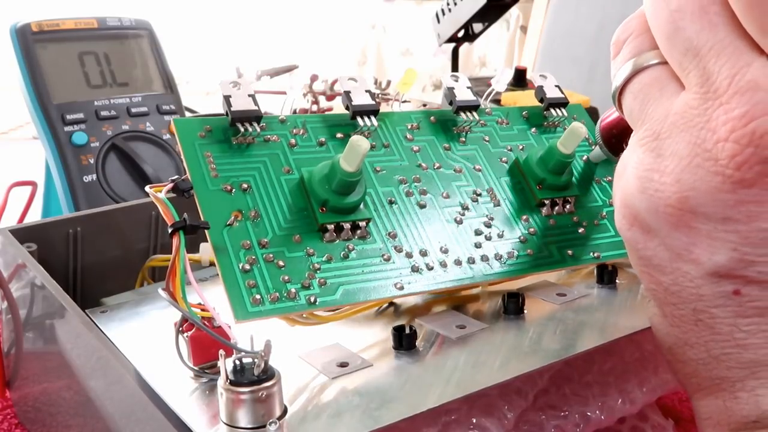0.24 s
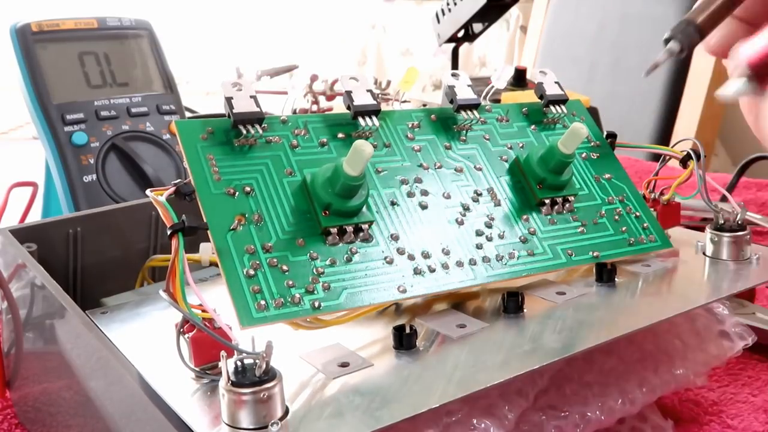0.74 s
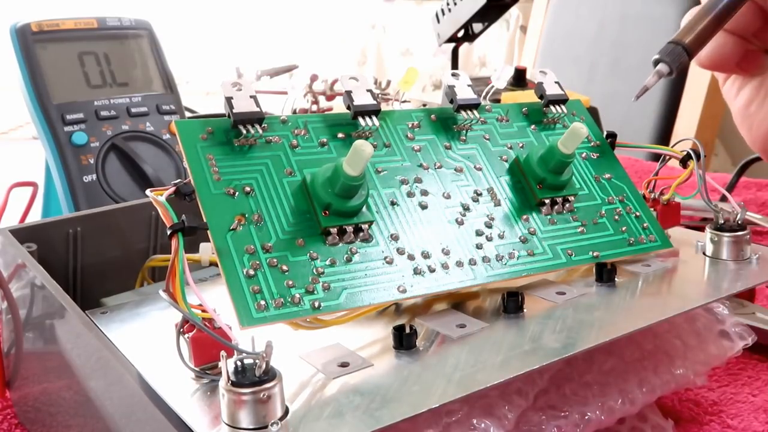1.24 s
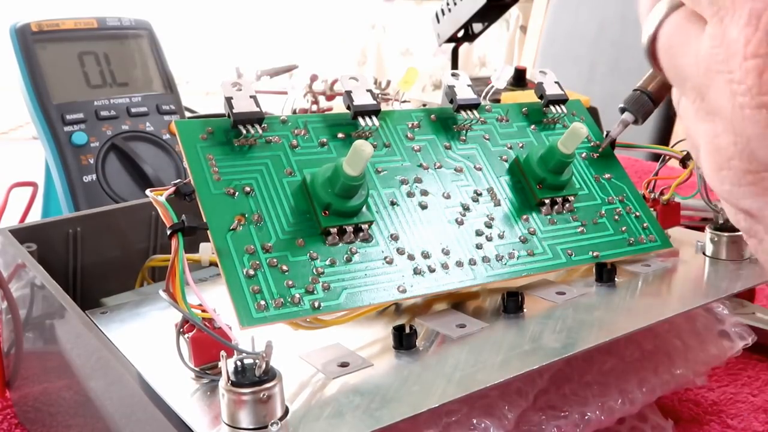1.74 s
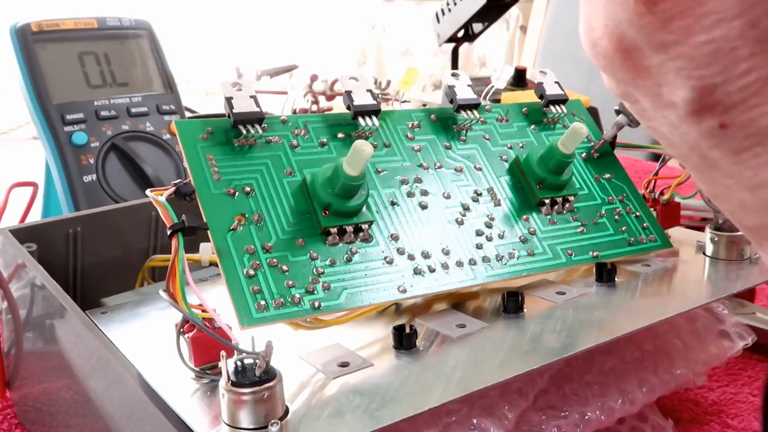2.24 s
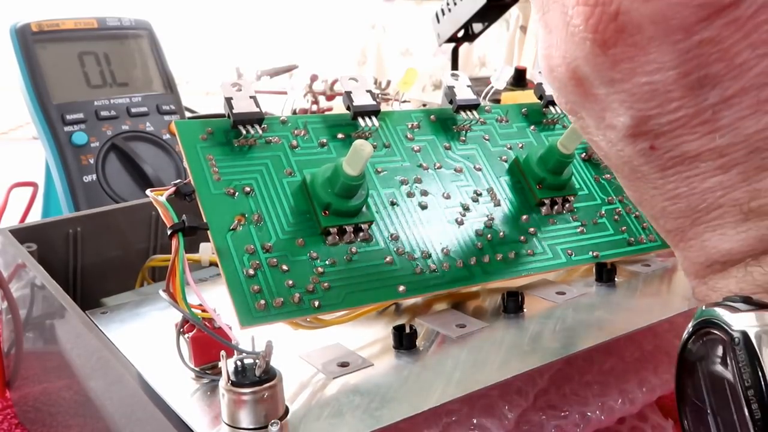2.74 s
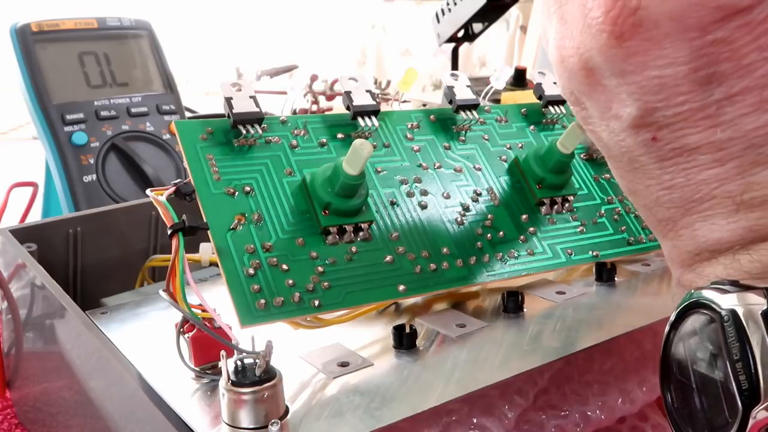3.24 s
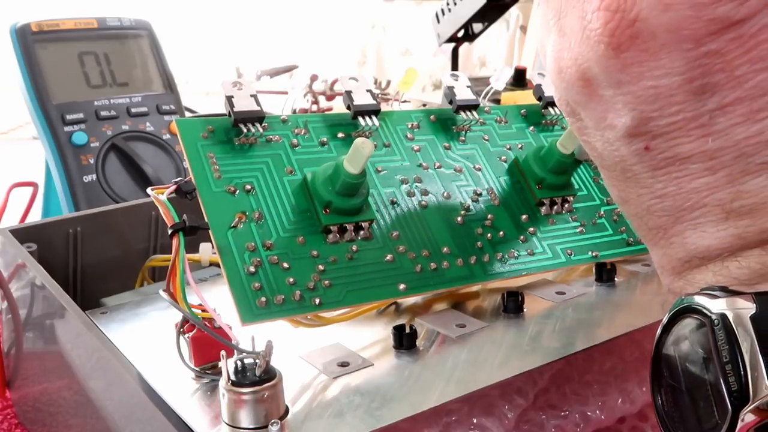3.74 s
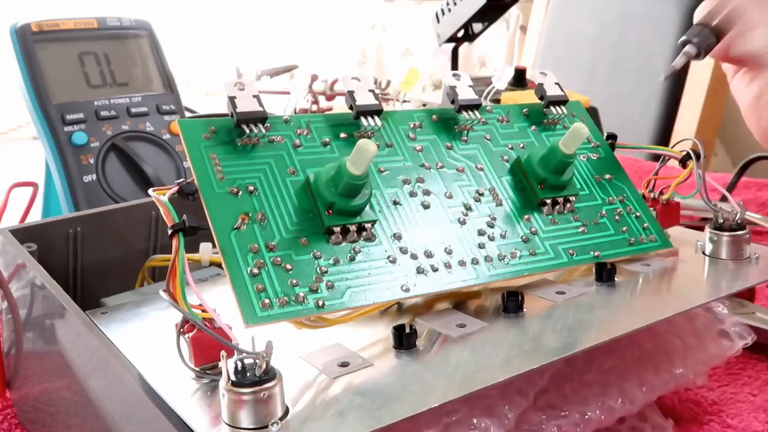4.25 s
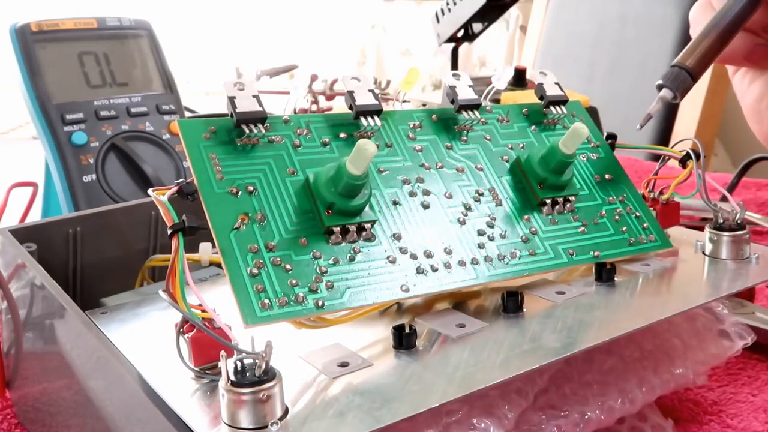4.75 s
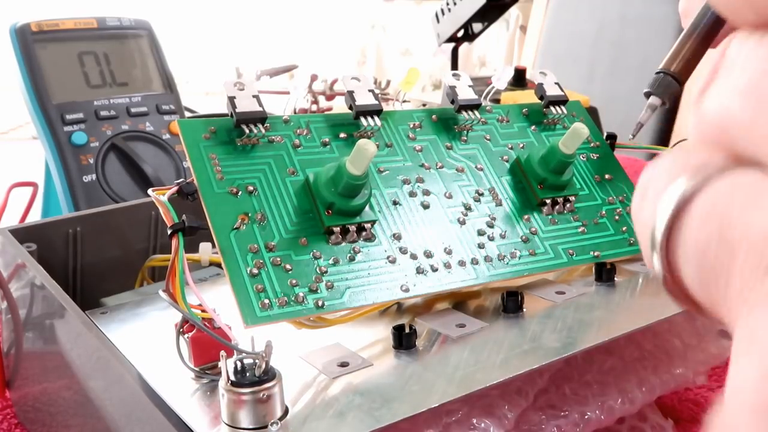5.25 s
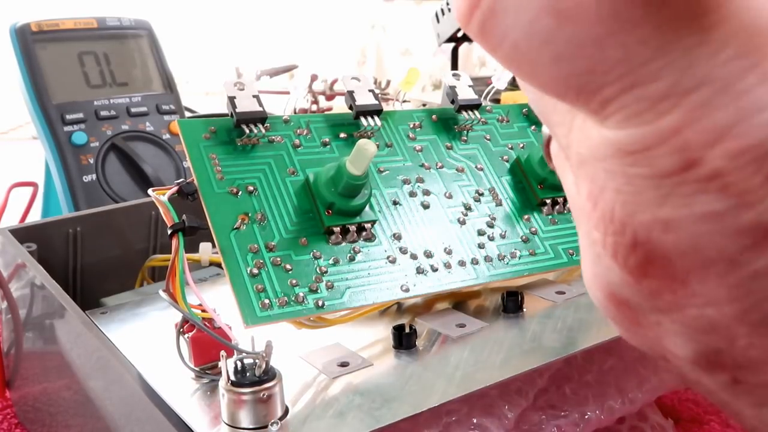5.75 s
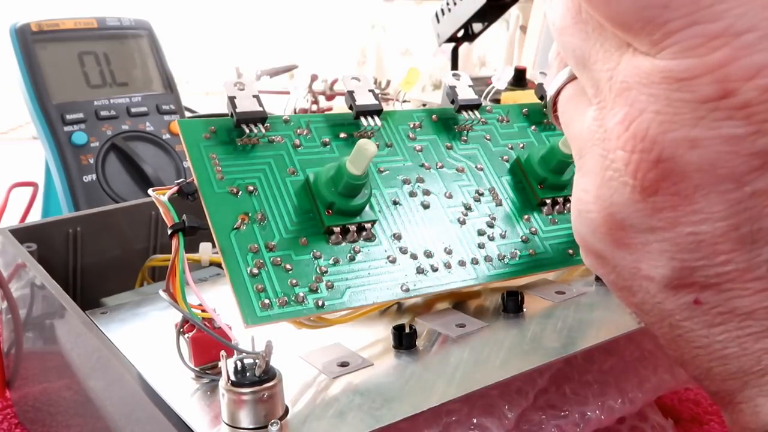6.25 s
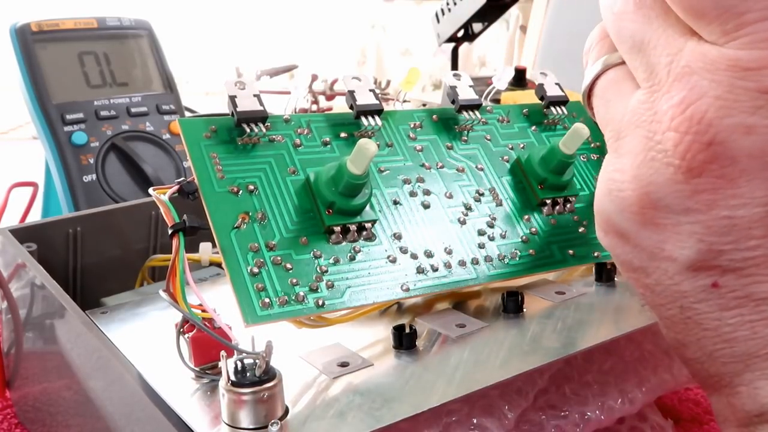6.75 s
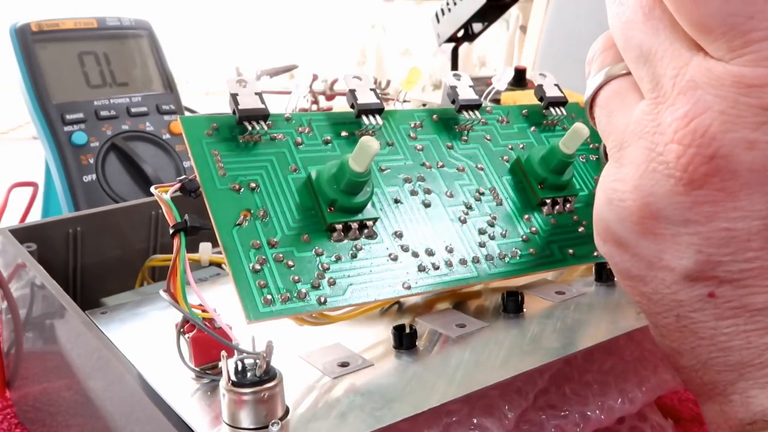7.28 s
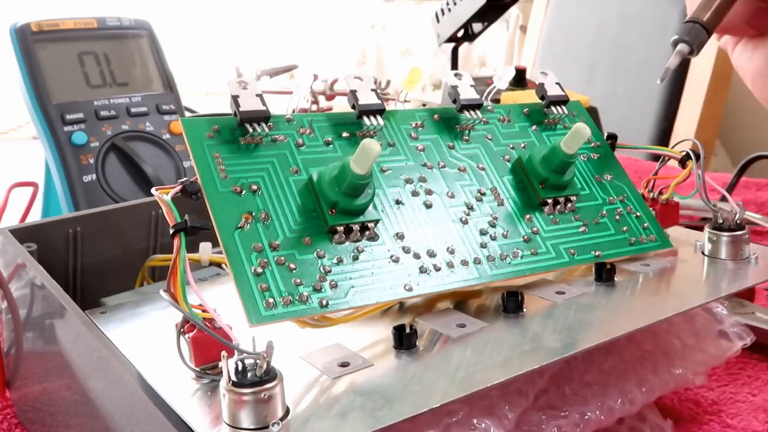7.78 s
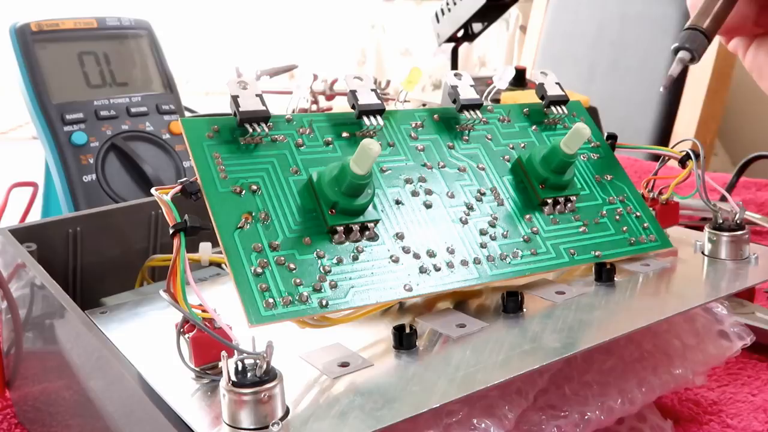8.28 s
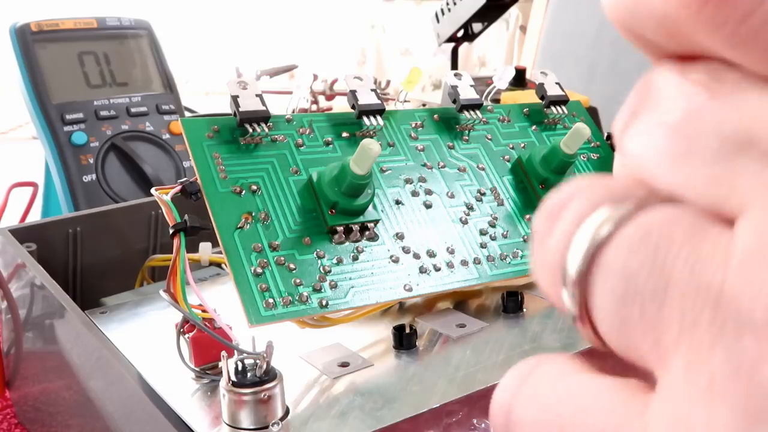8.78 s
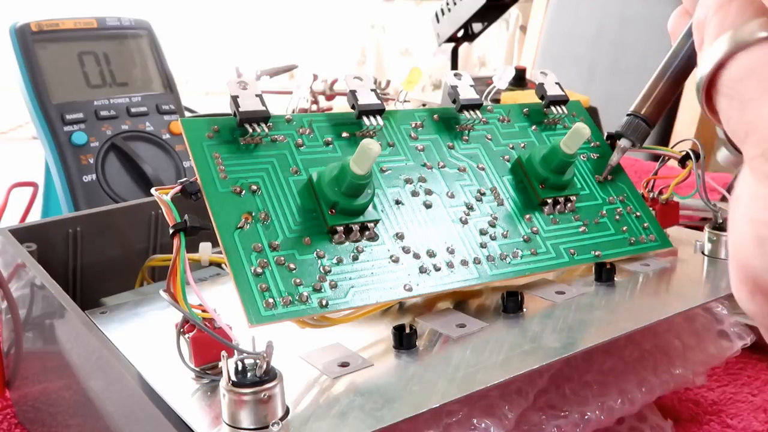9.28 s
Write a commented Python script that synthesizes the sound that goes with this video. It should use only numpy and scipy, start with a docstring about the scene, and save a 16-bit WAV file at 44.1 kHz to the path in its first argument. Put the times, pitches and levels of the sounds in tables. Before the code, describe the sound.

A spring-loaded solder sucker fires with sharp clacks and is re-cocked with bright snaps three times, close up in a small quiet room.

```python
"""A spring-loaded solder sucker is fired three times on a circuit board and cocked again, close to the mic.
Firing: button tick, rush of the piston as shaped noise, slam of ringing modes, then the board clatters.
Cocking: the seal hisses as noise, the latch snaps and buzzes, the plunger drops back and its spring rings.
Taps, tinks, scuffs and knocks fall between. A small room answers over room tone, hum and a thin whine;
gain control dips everything after loud hits."""
import sys
import numpy as np
from scipy import signal
from scipy.fft import rfft, irfft
from scipy.io import wavfile
from scipy.ndimage import uniform_filter1d

SR = 44100
rng = np.random.default_rng(int(sys.argv[2]) if len(sys.argv) > 2 else 0)


def wrap_up_sound(samples):
    """Save the sound to the file named by the first command line argument, as 16-bit audio."""
    columns = np.atleast_2d(samples).T
    # keep every value between -1 and 1, then stretch to whole-number steps
    tamed = np.clip(columns, -1, 1)
    steps = np.round(tamed * 32767).astype(np.int16)
    wavfile.write(sys.argv[1], SR, steps)


N = 419832

# modes of pump barrel and spring: f/Hz, t60/s, relative level/dB on slam, on latch, on drop
PUMP_MODES = [(112, 0.023, -16.5, -26.5, -40.5), (307, 0.042, -2.5, -25.5, 0), (684, 0.0081, -17, -38, 1.5),
              (1270, 0.0055, -16, -67, 3), (2160, 0.013, -22, -57, -19), (2800, 0.081, -27.5, -25, -33),
              (3150, 0.057, -15, -3, -3), (3456, 0.04, -12.5, 1.5, -23), (3800, .008, -19, -16, 9),
              (4950, 0.016, 6.5, -1, 1.5), (6160, 0.0076, -10, 11.5, 4), (5860, 0.0013, 7, 2, -21),
              (7510, 0.0093, 2.5, 17.5, 12.5), (9500, 0.005, -8, 6.5, -2), (13360, .008, -1, -31, -2)]


def gain_of(db):
    """Amplitude factor of a level in dB."""
    return 10 ** (np.asarray(db) / 20)


def evened(x):
    """Scale to rms 1."""
    return x / np.sqrt(np.mean(x ** 2) + 1e-20)


def read(points, hz):
    """Read a curve of (f/Hz, value) points, straight over log frequency."""
    f, value = np.transpose(points)
    return np.interp(np.log(hz + 1), np.log(f + 1), value)


def add(mix, s, sound):
    """Lay a sound into the mix from s seconds on, cut at the end."""
    part = mix[..., round(s * SR):][..., :sound.shape[-1]]
    part += sound[..., :part.shape[-1]]


def coloured(spectrum, count):
    """Noise with the given spectrum, scaled to rms 1 before it is cut to count samples."""
    size = max(count, 4096)
    bins = rfft(rng.standard_normal(size))
    bins = bins * gain_of(read(spectrum, np.fft.rfftfreq(size, 1 / SR)))
    return evened(irfft(bins, size))[:count]


def wavering(depth_db, width, count):
    """Gain that wanders by depth_db rms, smoothed over width samples: an uneven contact or flow."""
    return gain_of(depth_db * evened(uniform_filter1d(rng.standard_normal(count), width)))


def modes(hz, t60, db):
    """Sum of dying sines, one for each way the body vibrates; peak 1."""
    t = np.arange(SR // 3) / SR
    decay = gain_of(np.c_[db] - 60 * t / np.c_[t60])
    body = (decay * np.sin(2 * np.pi * np.c_[hz] * t)).sum(0)
    return body / abs(body).max()


def ring(hz, t60, db, contact_s, chatter_db):
    """One blow rings the modes and the parts chatter. Rows: sound towards the mic, sound round the room."""
    body, t = modes(hz, t60, db), np.arange(900) / SR
    crack = body[:60] * np.exp(-t[:60] / 0.0011)  # the bare contact: same colour, no ring
    crack = gain_of(chatter_db) * crack / np.linalg.norm(crack)
    off_axis = body * np.exp(-np.arange(len(body)) / SR / .004)  # long rings are faint off axis
    out = np.array([body, off_axis])
    chatter = rng.standard_normal(900) * np.exp(-(t / contact_s) ** 2)
    add(out[0], 0, np.convolve(chatter, crack))
    # summed over directions the chatter has an even spectrum
    add(out[1], 0, crack * np.sqrt(contact_s * SR / 4))
    return out


def board(hardness_db):
    """Modes of the board; a harder blow wakes the upper ones by hardness_db per octave."""
    # circuit board on its metal chassis: f/Hz, t60/s, relative level/dB
    board_modes = [(165, 0.4, -11.5), (350, 0.0567, -9.5), (477, 0.024, 8.5), (642.3, 0.16, 9.5),
                   (803, 0.11, -2.5), (1084, 0.026, 14.5), (1443, 0.042, -4), (2120, 0.033, -15.5),
                   (3220, .01, -8.5)]
    hz, t60, db = np.transpose(board_modes)
    return hz, t60, db + hardness_db * np.log2(hz / 650)


def rubbed(hardness_db, count):
    """The board kept ringing, and damped, by a rough lasting contact; rms 1."""
    hz, t60, db = board(hardness_db)
    damped = np.minimum(t60, .012)
    grit = rng.standard_normal(SR // 2) * wavering(2.3, 90, SR // 2)
    return evened(signal.fftconvolve(grit, modes(hz, damped, db), "valid")[:count])


def room_tone():
    """Random short-time spectra with drifting patches, alike at both ports only in the bass; one thin whine."""
    # colour of room tone and hiss: f/Hz, relative level/dB
    tone_colour = [(12, -53), (20, -8), (32, -10), (64, -7), (118, -13.5), (169, -9), (217, -10.5),
                   (337, -8.5), (540, -14.5), (1110, -18), (1390, -18), (6720, -30), (13400, -40.5),
                   (15000, -50)]
    # left-right likeness of the room tone: f/Hz, likeness (1 = the same)
    likeness = [(60, .99), (120, .85), (240, .3), (480, 0), (15000, 0)]
    # faint electric whine: f/Hz, rms level/dB
    whine_hz, whine_db = (13006, -93)
    tone_db = -56.5  # rms of the two ports averaged
    frames, hz = N // 256 + 5, np.fft.rfftfreq(1024, 1 / SR)
    a, b, c, d, patches = rng.standard_normal((frames, 513, 5)).T
    patches = evened(uniform_filter1d(uniform_filter1d(patches, 6, 0), 20, 1))
    patch_db = patches * (1.25 + 0.1 * np.exp(-hz / 400))[:, None]  # a little deeper in the bass
    same, left = np.clip(read(likeness, hz), -1, 1)[:, None], a + 1j * b
    right = same * left + np.sqrt(1 - same ** 2) * (c + 1j * d)
    z = np.array([left, right]) * gain_of(read(tone_colour, hz)[:, None] + patch_db)
    hiss = signal.istft(z, nperseg=1024, noverlap=768)[1][:, :N]
    hiss = gain_of(tone_db) * hiss / np.sqrt(np.mean(hiss.mean(0) ** 2))
    whine = np.sqrt(2) * gain_of(whine_db) * np.sin(2 * np.pi * whine_hz * np.arange(N) / SR)
    return hiss + whine


def hum():
    """A wavering hum nearby: noise through narrow resonances, alike at both ports."""
    # hum bands: f/Hz, width/Hz, rms level/dB
    hum_bands = [(61, 9.2, -64), (89, 5.7, -68.5), (153.1, 10, -74), (333, 18, -69)]
    out = np.zeros(N)
    for hz, width, db in hum_bands:
        band = signal.lfilter(*signal.iirpeak(hz, hz / width, fs=SR), rng.standard_normal(N))
        out += gain_of(db) * evened(band)
    return out


def nozzle_taps():
    """Nozzle or iron touches the board and rings its modes."""
    # touches: t/s, level/dB, hardness/(dB per octave)
    touches = [(0.369, -35, -6.5), (1.481, -38.5, -3), (1.524, -50.5, 7), (2.6054, -28.5, 8.5),
               (2.837, -45, -8.5), (2.937, -35.5, 5), (3.0713, -42.5, 6), (3.178, -38.5, -8),
               (8.4967, -39, 2), (9.338, -63.5, 9.5)]
    out = np.zeros((2, N))
    for s, db, hardness_db in touches:
        add(out, s, gain_of(db) * ring(*board(hardness_db), 0.011, chatter_db=-8))
    return out


def small_ticks():
    """Button, ring and plunger tick: brief high modes of tiny parts."""
    # ticks: t/s, level/dB, f/Hz that the overtones are scaled from
    tick_events = [(0.661, -30.5, 2140), (1.1875, -21.5, 4000), (1.3533, -18, 4800), (1.435, -34, 4040),
                   (3.909, -38.5, 2420), (4.1334, -25.5, 4650), (4.137, -24.5, 2460), (4.449, -28.5, 4700),
                   (4.6769, -36.5, 1800), (4.826, -38, 5700), (6.575, -44, 1513), (7.1312, -42, 1540),
                   (7.6225, -16.5, 2830), (8.056, -37.5, 4380), (8.354, -17.5, 4770), (8.4652, -30, 7280)]
    out = np.zeros((2, N))
    thin = signal.butter(1, 1200, "high", fs=SR, output="sos")  # tiny parts have no low end
    t60 = .004 * np.array([.6, 1.5, 1.1, 0.41])
    for s, db, hz in tick_events:
        overtones = np.minimum(hz * np.array([.62, 1.01, 1.45, 2.1]), 15000)
        tick = ring(overtones, t60, [-34.5, 0, 3.0, 4.0], contact_s=.0013, chatter_db=-7.0)
        add(out, s, gain_of(db) * signal.sosfilt(thin, tick))
    return out


def firings():
    """Rush, slam with a rattle of spring and solder, recoil into the board, which then clatters on its posts."""
    # piston hits its stop: t/s, slam level/dB, rush level/dB, clatter level/dB
    shots = [(0.7050, 1.5, -16, -23), (4.2102, 2, -14, -21.5), (7.6750, 2.5, -12.5, -24)]
    # air and spring in flight: f/Hz, relative level/dB
    rush_colour = [(59, -42), (100, 2), (1210, -10), (1770, -15.5), (2330, -3.5), (3340, -9), (4990, -6),
                   (8290, -5), (12700, -1), (15600, -23)]
    flight_s, speedup_s = .02, .012  # piston travel time, and the part of it spent gathering speed
    clatter_after_s = 0.035  # the board starts to clatter this long after the slam
    out, (hz, t60, slam_db, *_) = np.zeros((2, N)), np.transpose(PUMP_MODES)
    t, flight = np.arange(SR // 5) / SR, np.arange(SR // 25) / SR
    speed = np.minimum(flight / speedup_s, 1) ** 2 * (flight < flight_s)
    burst_decay = gain_of(-60 * t / 0.024) + 0.29 * gain_of(-60 * t / 0.14)
    clatter_shape = np.exp(-t[:6000] / 0.033) * np.minimum(t[:6000] / 0.0027, 1)
    rattle_band = signal.butter(1, [400, 6500], "band", fs=SR, output="sos")
    for s, db, rush_db, clatter_db in shots:
        rasp = evened(wavering(2.5, 30, len(flight)))
        rush = coloured(rush_colour, len(flight)) * rasp * speed
        add(out, s - flight_s, gain_of(rush_db) * rush)
        add(out, s, gain_of(db) * ring(hz, t60, slam_db, 0.0033, chatter_db=-4.5))
        add(out, s, gain_of(db - 5.0) * coloured(rush_colour, len(t)) * burst_decay)
        rattle = signal.sosfilt(rattle_band, rng.standard_normal(len(t)))
        rattle = evened(rattle * wavering(6.5, 70, len(t)))
        add(out, s, gain_of(db - 27 - 60 * t / 0.3) * rattle)
        add(out, s + 0.00052, gain_of(db - 25.0) * modes(*board(-11.5)))  # recoil
        add(out, s + clatter_after_s, gain_of(clatter_db) * rubbed(2.2, count=6000) * clatter_shape)
    return out


def cocking():
    """The seal hisses until the latch snaps, bounces and buzzes; then the plunger drops back."""
    # strokes: thumb starts to push t/s, seal hiss level/dB, latch snaps t/s, level/dB, barrel pitch factor,
    # plunger drops back t/s, level/dB, spring ring level/dB
    strokes = [(1.45, -45.5, 1.5938, 0, .97, 1.7116, -13, -31),
               (4.819, -45.5, 4.9870, 1, 1.03, 5.0969, -10.5, -31.5),
               (8.446, -44, 8.5914, 1, 1.047, 8.7136, -5.5, -22)]
    # hiss of the seal: f/Hz, relative level/dB
    seal_colour = [(200, -9.5), (550, -21), (950, -15), (1150, -21), (2100, -18), (6500, -14.5),
                   (9500, -14.5), (13000, -23.5), (16000, -41)]
    # coil spring, rung by the drop: f/Hz, t60/s, relative level/dB
    spring_modes = [(4750, .19, 0), (4790, .08, -8), (5280, .08, -5)]
    push_s, push_db = .025, -14  # the hiss rises from this far down as the stroke gets going
    sag_db_per_s = -19.5  # then eases a little
    edge_s, edge_db = 0.028, 22.5  # level ramp over the last stretch of noise
    rebound_s, rebound_db = .008, -20.5  # the latch bounces once
    out, (hz, t60, _, latch_db, drop_db) = np.zeros((2, N)), np.transpose(PUMP_MODES)
    thin = signal.butter(1, 900, "high", fs=SR)  # the latch snap is thin in the bass
    for start_s, hiss_db, latch_s, snap_db, pitch, drop_s, fall_db, spring_db in strokes:
        t = np.arange(0, latch_s - start_s, 1 / SR)
        level_db = (hiss_db + push_db * np.clip(1 - t / push_s, 0, 1) + sag_db_per_s * t
                    + edge_db * np.clip(1 - (t[-1] - t) / edge_s, 0, 1))
        slip = evened(wavering(2.2, 150, SR // 4)[:len(t)])
        add(out, start_s, gain_of(level_db) * coloured(seal_colour, SR // 4)[:len(t)] * slip)
        snap = ring(hz * pitch, t60, latch_db, 0.0022, chatter_db=-3)
        add(out, latch_s, gain_of(snap_db) * signal.lfilter(*thin, snap))
        rebound = ring(hz * pitch, t60, latch_db, 0.002, chatter_db=-15.5)
        add(out, latch_s + rebound_s, gain_of(snap_db + rebound_db) * rebound)
        add(out[0], latch_s, gain_of(snap_db) * buzz(2980 * pitch))
        add(out[0], drop_s, gain_of(spring_db) * modes(*np.transpose(spring_modes)))
        add(out, drop_s, gain_of(fall_db) * ring(hz, t60, drop_db, 0.00077, chatter_db=5.5))
    return out


def buzz(hz):
    """The loose spring buzzes after the latch: uneven noise through a broad barrel resonance, dying away."""
    half_width_hz, level_db, t60_s = 230, -21, .24
    t = np.arange(SR // 6) / SR
    grit = rng.standard_normal(len(t)) * wavering(3.5, 150, len(t))
    band = signal.butter(2, [hz - half_width_hz, hz + half_width_hz], "band", fs=SR, output="sos")
    return evened(signal.sosfilt(band, grit)) * gain_of(level_db - 60 * t / t60_s)


def metal_tinks():
    """A metal part tinks: three modes, the upper two dying sooner."""
    # tinks: t/s, level/dB, lowest mode f/Hz, its t60/s
    tink_events = [(2.0364, -32, 1980, 0.056), (2.095, -37.5, 3680, 0.011)]
    out = np.zeros((2, N))
    for s, db, hz, t60 in tink_events:
        overtones, decays = hz * np.array([1, 1.95, 3.2]), t60 * np.array([1, .25, .2])
        add(out, s, gain_of(db) * ring(overtones, decays, [0, -4, -6], 0.0011, chatter_db=-18))
    return out


def board_scuffs():
    """Fingers and nozzle scuff the board: a rough contact that grows and fades."""
    # scuffs: t/s, level/dB ahead of the fade in and out
    scuff_events = [(3.181, -53.5), (6.182, -59), (6.349, -57), (6.56, -58.5), (7.109, -54.5), (9.328, -52)]
    out, count = np.zeros((2, N)), round(0.058 * SR)
    for s, db in scuff_events:
        add(out, s, gain_of(db) * rubbed(3.2, count=count) * np.hanning(count))
    return out


def hand_thuds():
    """A hand knocks dully on the bench: three low, damped modes."""
    # knocks: t/s, level/dB, f/Hz that the modes are scaled from
    knocks = [(4.62, -27.5, 333), (4.817, -40, 266), (8.156, -26.5, 229.5), (8.17, -28, 316),
              (8.558, -36.5, 254)]
    out, t60 = np.zeros((2, N)), .065 * np.array([1, 1, .2])
    for s, db, hz in knocks:
        thud = ring(hz * np.array([.6, 1.01, 1.5]), t60, [-6, 0, -6], .003, chatter_db=-22.5)
        add(out, s, gain_of(db) * thud)
    return out


def room(direct, around):
    """Direct sound reaches the right port first; two dull wall echoes and a dense tail follow, tails apart."""
    # colour of the tail: f/Hz, relative level/dB
    tail_colour = [(150, 1), (500, -2.5), (1200, -2.5), (3070, 1.5), (5030, -0.5), (7500, -4.5),
                   (10200, -1), (15100, -3)]
    # decay of the tail: f/Hz, t60/s
    tail_decay = [(150, .25), (500, .26), (1200, .27), (3070, .25), (5030, .28), (7500, .21), (10200, .17),
                  (13000, .13), (15500, .05)]
    # walls: delay t/s, level/dB
    wall_echoes = [(.0072, -21), (0.0129, -19)]
    taps = np.zeros((2, SR // 2))
    grid = np.arange(140, SR // 2 - 20, 10)
    at = grid + rng.integers(0, 10, (2, len(grid)))
    np.put_along_axis(taps, at, rng.choice([-1., 1.], at.shape), 1)
    hz, t, z = signal.stft(taps, SR, nperseg=256)
    alike = np.clip(1 - hz / 1500, 0, 1)[:, None]  # long waves reach both ports alike
    z[1] = alike * z[0] + np.sqrt(1 - alike ** 2) * z[1]
    t60, tail_db = read(tail_decay, hz)[:, None], read(tail_colour, hz)[:, None]
    tail = signal.istft(z * gain_of(tail_db - 60 * t / t60), SR, nperseg=256)[1]
    tail *= gain_of(-10.0) / np.linalg.norm(tail[0])
    dull = signal.lfilter(*signal.butter(1, 4000, fs=SR), direct)
    paths = direct + sum(gain_of(db) * np.roll(dull, round(delay * SR)) for delay, db in wall_echoes)
    late = .9 * np.roll(paths, 2) + .1 * np.roll(paths, 1)  # just under two samples later
    ports = np.array([gain_of(-.5) * late, gain_of(.75) * paths])  # left, right
    return ports + signal.oaconvolve(around[None], tail, axes=1)[:, :N]


def scene():
    """The bench sounds in their room, over room tone and hum."""
    ambience = room_tone() + hum()
    bench = nozzle_taps() + small_ticks() + firings() + cocking()
    bench += metal_tinks() + board_scuffs() + hand_thuds()
    small = signal.butter(3, 100, "high", fs=SR, output="sos")  # small things radiate no deep bass
    return room(*signal.sosfilt(small, bench)) + ambience


def record(dry):
    """Gain control sinks a few dB after loud hits and creeps back; peaks clip; then the band limit."""
    edge_hz = 15780
    power_db = 10 * np.log10(abs(uniform_filter1d((dry ** 2).mean(0), 1300)) + 1e-12)
    fall = np.arange(N) * 46.0 / SR  # the detector forgets 46 dB a second
    held_db = np.maximum.accumulate(power_db + fall) - fall
    over_db = np.maximum(held_db + 45.0, 0)  # threshold -45 dB
    pace = np.exp(-1 / (.06 * SR))  # gain moves with a 60 ms time constant
    ducked = dry / gain_of(0.21 * signal.lfilter([1 - pace], [1, -pace], over_db))
    clipped = np.clip(ducked, -.95, .95)
    low_pass = signal.firwin(511, edge_hz, window=("kaiser", 9), fs=SR)
    return signal.oaconvolve(clipped, low_pass[None], "same")


dry = scene()
out = record(dry)
wrap_up_sound(out)
```